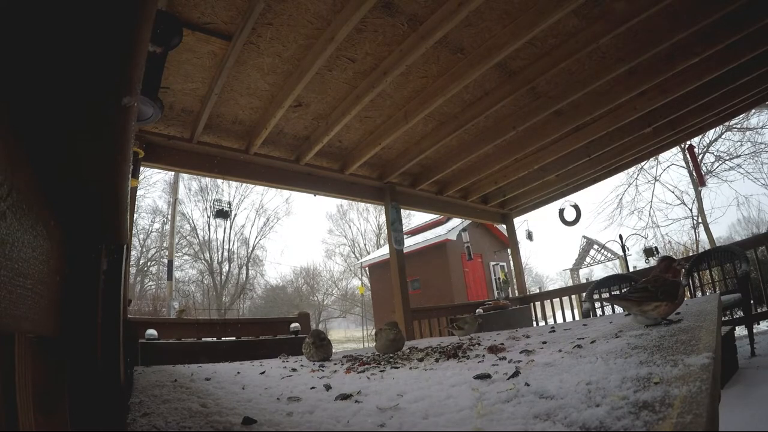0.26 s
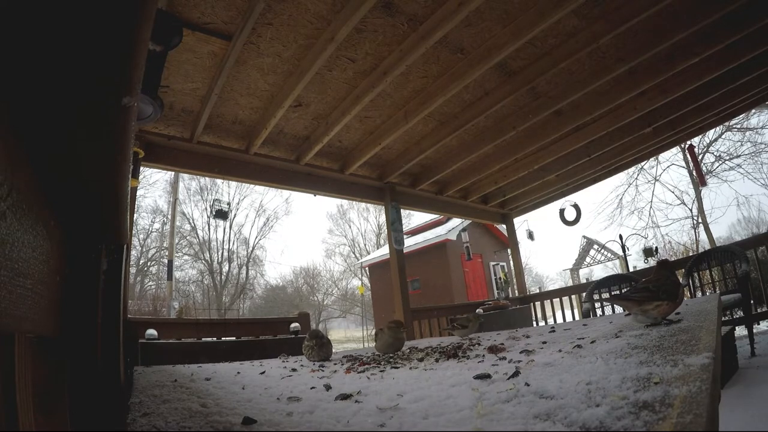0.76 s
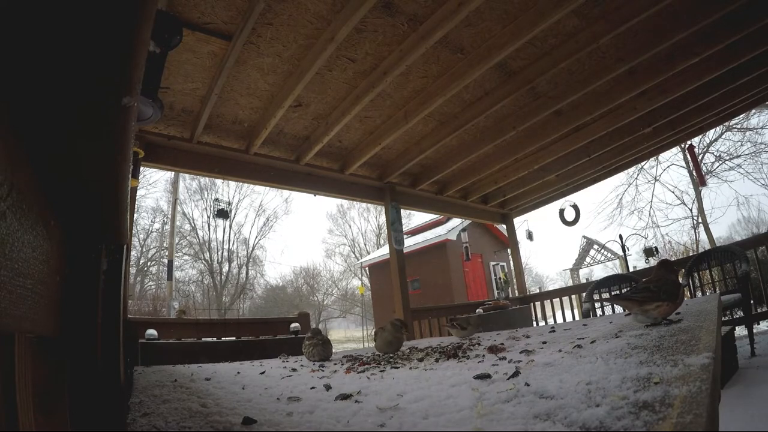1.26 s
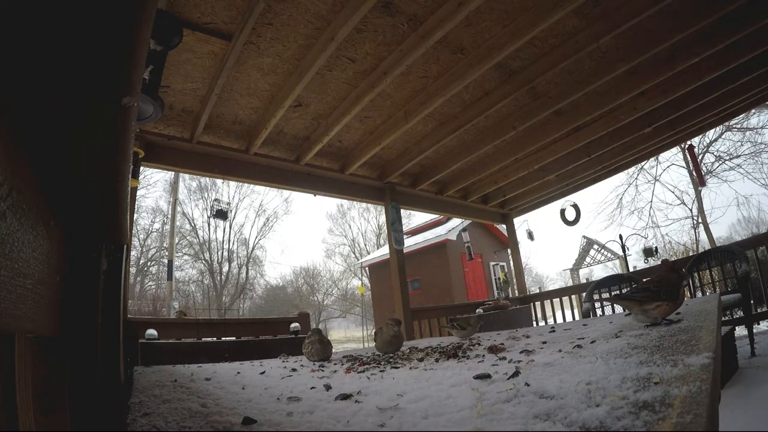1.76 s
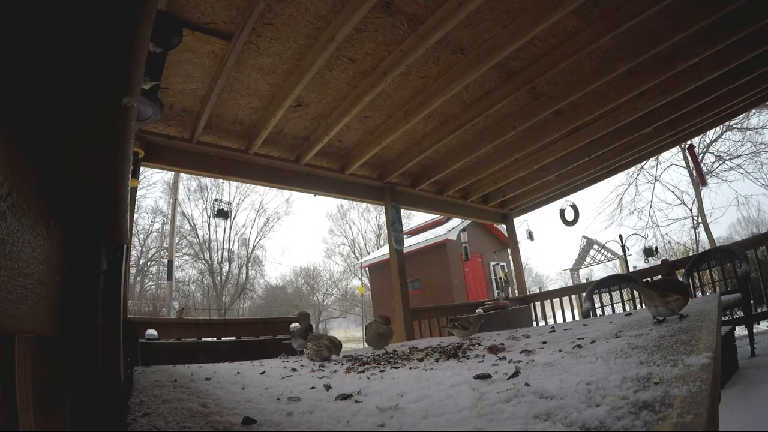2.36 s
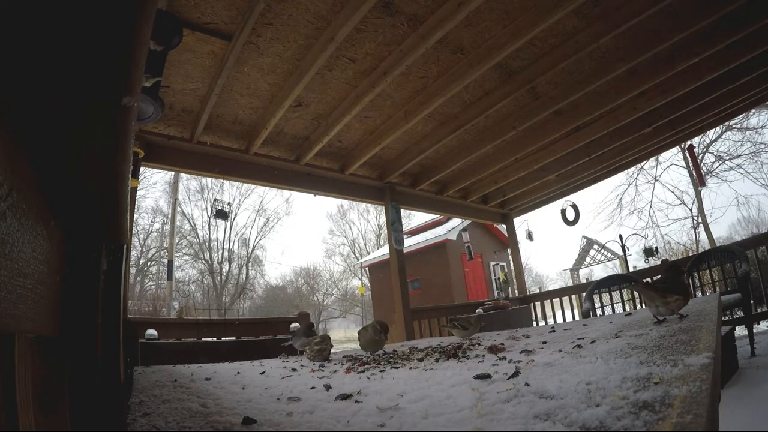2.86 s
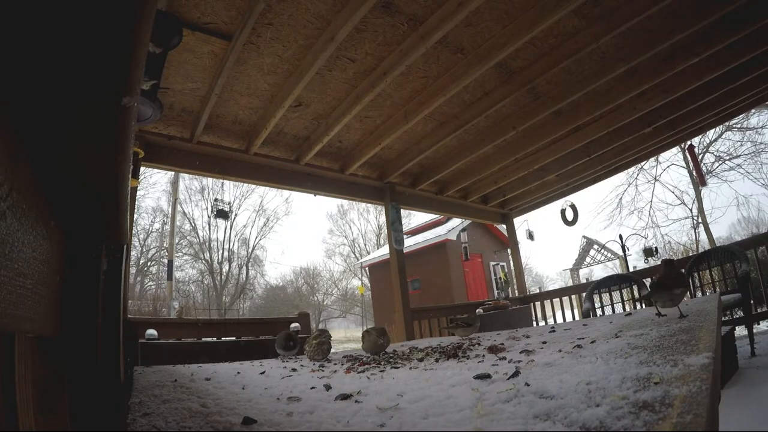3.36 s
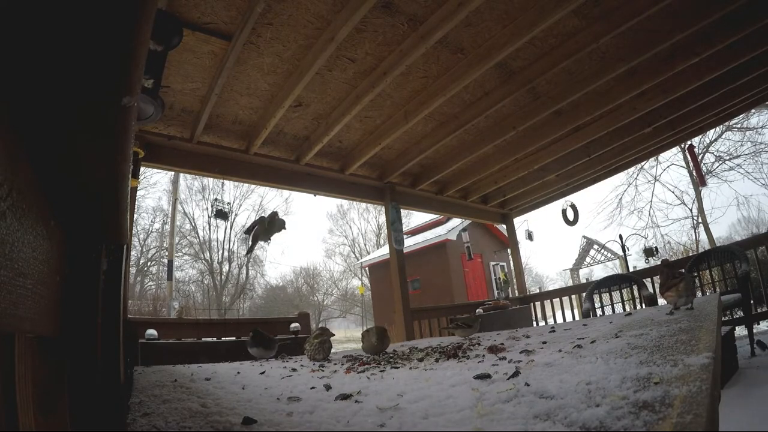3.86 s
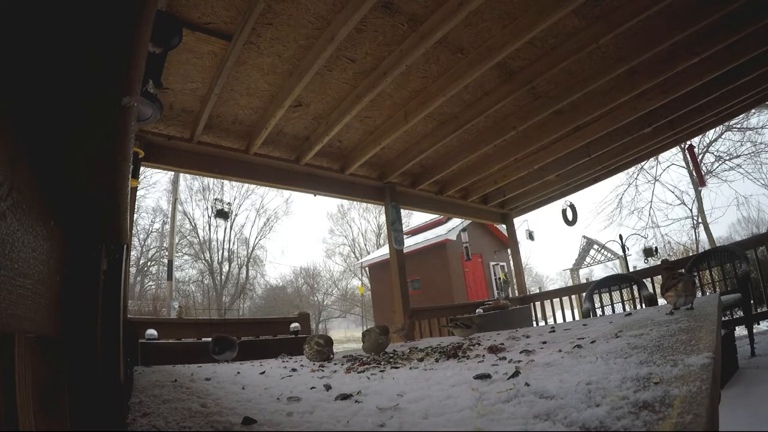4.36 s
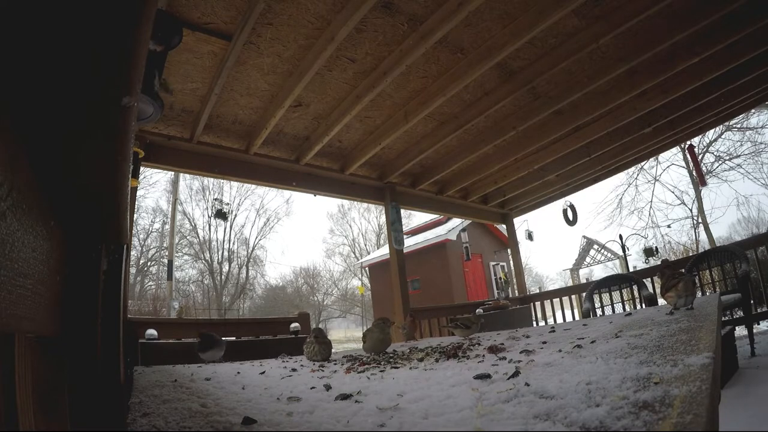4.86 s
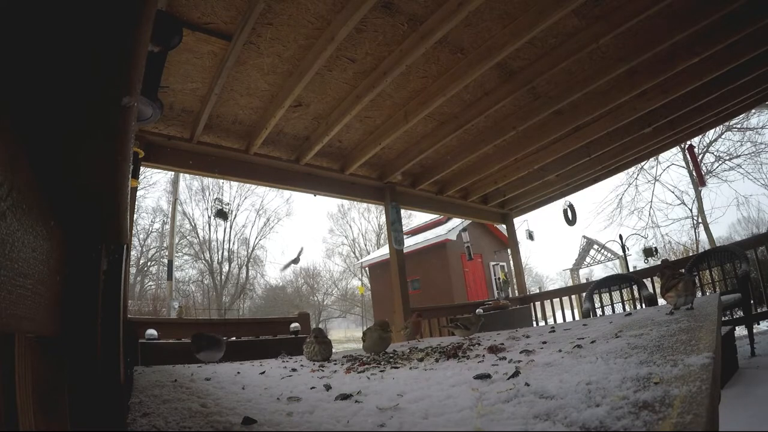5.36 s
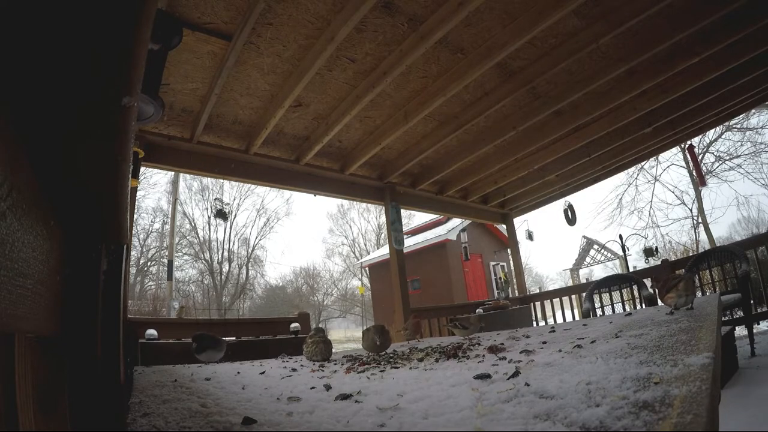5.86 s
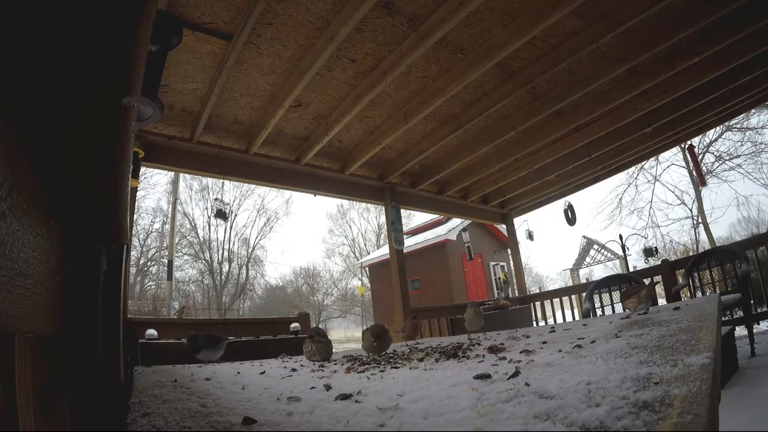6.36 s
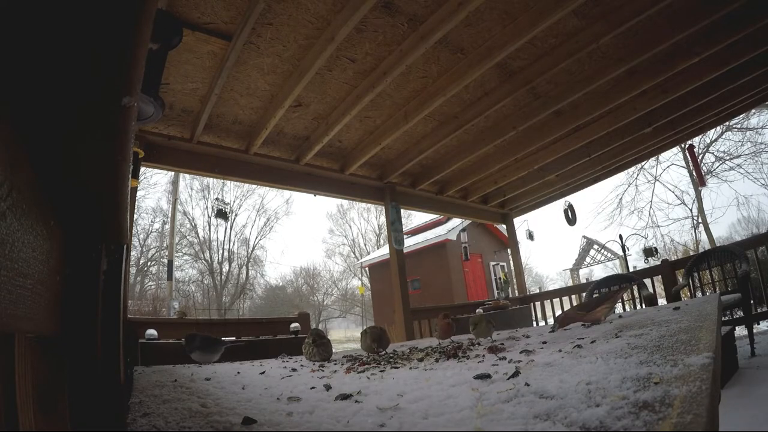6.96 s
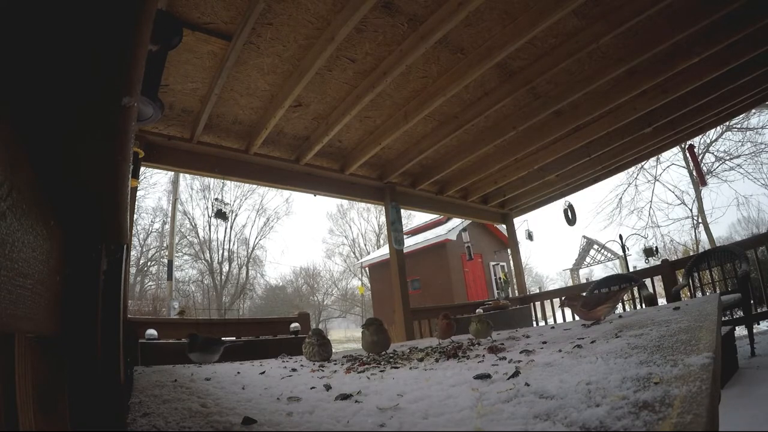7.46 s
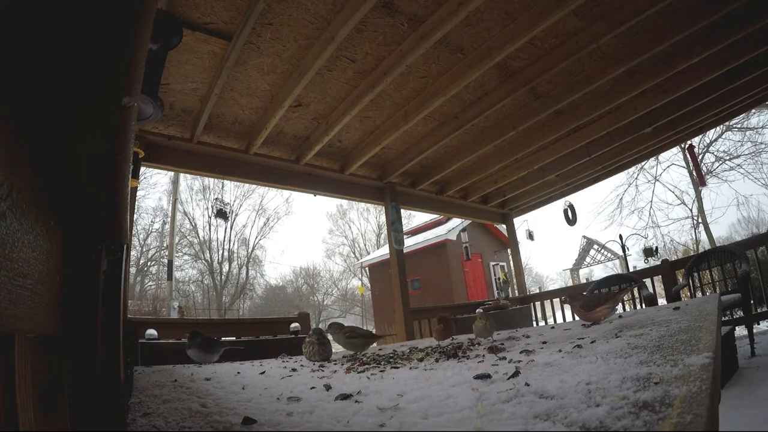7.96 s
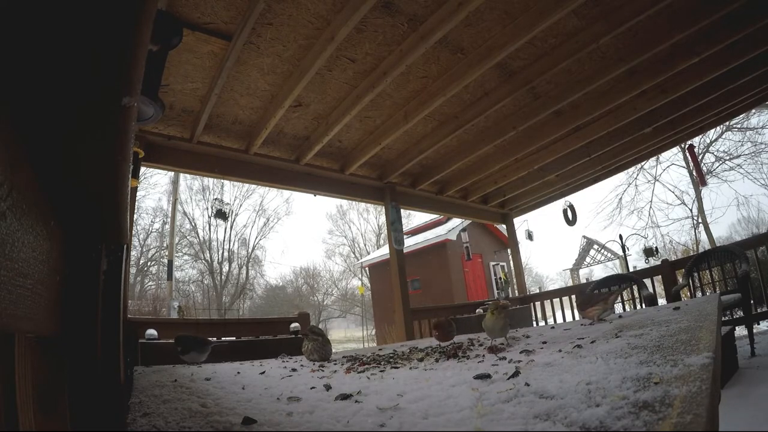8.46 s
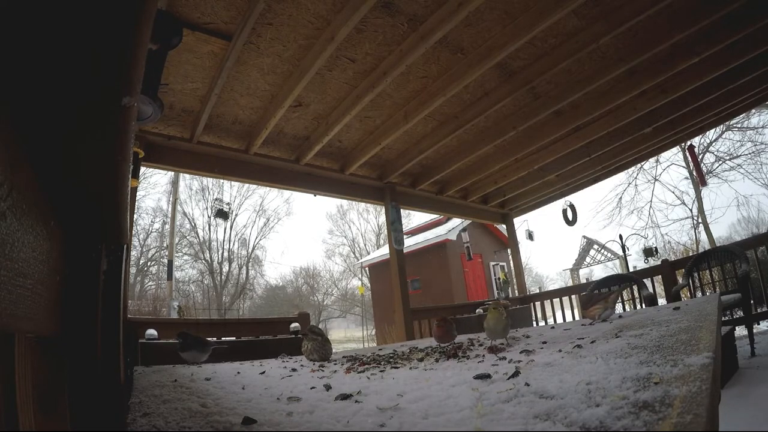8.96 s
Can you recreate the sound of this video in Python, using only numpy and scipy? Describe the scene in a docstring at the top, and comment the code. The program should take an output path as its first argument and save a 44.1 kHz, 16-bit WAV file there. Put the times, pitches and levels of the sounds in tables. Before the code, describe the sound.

Dry irregular ticks and small rustles start at once, close to the microphone, beneath a sheltering wooden roof with short echoes. A bird chirps thinly, then scolds nearby: a bright whistle falling into hoarseness, then three buzzing two-toned notes. A distant vehicle passes faintly. Quiet chirps dot the middle, and pecking grows busy and crisp later, over rumbling far traffic, soft hiss and low wind bumps.

```python
"""Small birds feed on a snowy porch table: bills tick on seed, feet and husks rustle from start to end.
Far traffic rumbles, a faint hiss stays on and light wind thuds on the microphone throughout.
After a thin chirp, one bird scolds close by with both sides of its syrinx: a falling note, then three raspy ones.
As the last raspy note ends, a far vehicle swells out of the traffic; more chirps follow among the pecks.
Noise is filtered into wind, traffic and hiss; clicks ring as husks and seed; wavering sines make the voices."""
import sys
import numpy as np
from scipy import signal
from scipy.fft import rfft, irfft, next_fast_len
from scipy.io import wavfile
from scipy.ndimage import uniform_filter1d

SR = 44100
rng = np.random.default_rng(int(sys.argv[2]) if len(sys.argv) > 2 else 0)


def output_pcm(signal):
    """Save a mono or channel-first signal as 16-bit PCM at the path in sys.argv[1].

    Samples are clipped to [-1, 1] before scaling.
    """
    pcm = np.clip(np.atleast_2d(signal).T, -1, 1) * 32767
    wavfile.write(sys.argv[1], SR, np.round(pcm).astype(np.int16))


N = 405719   # length in samples


def amp(db):
    """Turn a level in dB into a gain."""
    return 10 ** (np.asarray(db) / 20)


def rms_one(x):
    """Scale a sound to an average strength (rms) of 1."""
    return x / np.sqrt(np.mean(np.abs(x) ** 2) + 1e-20)


def evened(x, size=600):
    """Hold the strength, averaged over size samples, near 1."""
    return x / np.sqrt(uniform_filter1d(x ** 2, size=size).clip(0) + 1e-12)


def stretch(rows):
    """Give the samples a table covers, and each of its columns drawn as straight lines between the rows."""
    s, *columns = np.transpose(rows)
    at = np.arange(max(round(s[0] * SR), 0), min(round(s[-1] * SR), N))
    return at, [np.interp(at / SR, s, column) for column in columns]


def level(tables):
    """Make a gain over time from tables of seconds and dB: silent outside them, with soft ends."""
    gain = np.zeros(N)
    for rows in tables:
        at, (db,) = stretch(rows)
        gain[at] = amp(db)
    return uniform_filter1d(gain, size=300)


def coloured(x, spectrum):
    """Filter a sound by a table of Hz and dB, then scale it to rms 1."""
    size = next_fast_len(N)
    hz, db = np.transpose(spectrum)
    bin_hz = np.arange(size // 2 + 1) * SR / size
    gain = amp(np.interp(np.log(bin_hz + 1), np.log(hz), db))   # straight lines over log pitch
    return rms_one(irfft(rfft(x, size) * gain, size)[:N])


def band(x, hz, ratio):
    """Ring like a broad resonance, from hz / ratio to hz * ratio."""
    return signal.sosfilt(signal.butter(1, [hz / ratio, hz * ratio], "band", fs=SR, output="sos"), x)


def drift(hz, size=N):
    """Wander slowly by chance: noise sent twice through a one-pole low-pass, rms 1."""
    r = np.exp(-2 * np.pi * hz / SR)
    settle = 8000   # samples thrown away while the filter starts up
    noise = rng.standard_normal(size + settle)
    return rms_one(signal.lfilter([1], [1, -2 * r, r * r], noise)[settle:])


def crackle(per_s, spread_db, shape):
    """Scatter random clicks of uneven size and either sign, rms 1."""
    sizes = amp(spread_db * np.minimum(rng.exponential(1, shape), 5))
    signs = rng.choice([-1, 1], shape)
    return rms_one(sizes * signs * (rng.random(shape) < per_s / SR))


# Sound colours of wind, traffic and hiss. Each row: pitch in Hz, relative strength in dB per Hz.
WIND_COLOUR = [(12, 8), (30, 15), (45, 13), (70, -1.5), (120, -51)]
TRAFFIC_COLOUR = [(18, -1.5), (30, -6), (76, -0.5), (279, -13.5), (491, -13.5), (561, -15), (850, -29),
                  (1600, -38), (2080, -42), (3520, -120)]
HISS_COLOUR = [(530, -28), (900, 4.5), (1550, -3.5), (2710, 3), (4150, -1.5), (8760, -10), (13100, -12),
               (15300, -11)]
# Strength of the wind, then of the traffic. Each row: time in seconds, level in dB.
WIND_GUSTS = [(0.0, -56), (0.28, -30.5), (0.56, -47.5), (1.28, -37), (1.87, -48), (2.02, -42.5),
              (3.12, -50), (3.48, -39.5), (4.02, -44.5), (4.15, -35), (4.61, -45), (4.92, -35.5),
              (5.3, -39.5), (5.81, -46.5), (6.0, -43.5), (7.97, -49), (8.81, -37.5), (9.2, -34.5)]
TRAFFIC_LEVEL = [(0.0, -41), (2.2, -42), (4.7, -43.5), (6.4, -44), (9.2, -43)]
HISS_DB = -64
# One far vehicle: when it is loudest, how widely it spreads in time, its level and its pitch.
PASS_S, PASS_SPREAD_S, PASS_DB, PASS_HZ = 3.38, 0.47, -62, 780


def background():
    """Lumpy wind, traffic rumble, one passing vehicle and a steady hiss, each from filtered noise."""
    t = np.arange(N) / SR
    steady_wind = evened(coloured(rng.standard_normal(N), WIND_COLOUR), size=9000)
    wind = level([WIND_GUSTS]) * steady_wind
    traffic = level([TRAFFIC_LEVEL]) * coloured(rng.standard_normal(N), TRAFFIC_COLOUR)
    tyres = band(band(rng.standard_normal(N), PASS_HZ, 1.17), PASS_HZ, 1.17)
    swell = np.exp(-.5 * ((t - PASS_S) / PASS_SPREAD_S) ** 2)
    passing = amp(PASS_DB) * swell * rms_one(tyres)
    hiss = amp(HISS_DB) * coloured(rng.standard_normal(N), HISS_COLOUR)
    return wind + traffic + passing + hiss


# Busy feet among husks. Each row: time in seconds, level in dB.
PATTER_LEVEL = [(0.0, -48.5), (0.26, -64), (0.73, -67), (1.65, -66.5), (3.95, -72), (4.61, -65),
                (5.01, -68.5), (5.22, -66.5), (5.43, -69.5), (6.94, -67.5), (7.23, -67), (7.44, -54),
                (7.71, -63.5), (7.86, -77), (8.31, -64.5), (8.7, -62.5), (9.2, -69.5)]
# Sound colour of the husks. Each row: pitch in Hz, relative strength in dB per Hz.
HUSK_COLOUR = [(760, -12), (1300, -8.5), (2570, -3.5), (3570, -9.5), (4720, -5.5), (5620, -17), (6240, -10),
               (7510, -19.5), (15300, -22)]


def patter():
    """Many faint contacts in clumps; each click rings one of ten husk sizes."""
    grains = crackle(2500, 3.0, N) * amp(4 * drift(25))
    pitches_hz = np.geomspace(1500, 13000, 10)
    dealt = rng.integers(0, 10, N)   # which husk each click lands on
    rings = np.zeros(N)
    for k, hz in enumerate(pitches_hz):
        hits = grains * (dealt == k) * amp(3.4 * drift(27))
        rings += rms_one(band(hits, hz, 1.08)) * np.sqrt(hz)
    return level([PATTER_LEVEL]) * coloured(rings, HUSK_COLOUR)


# Pecks and hops. Each row: start in seconds, peak of the crack in dB, pitch of the ring in Hz,
# treble in dB over the ring, rustle in dB over the crack, length of the rustle in milliseconds.
CONTACTS = [(0.047, -33, 2920, -15, -5, 8.1), (0.08, -48, 4500, -20, -3, 14),
            (0.1246, -41, 4230, -7, -2, 19), (0.164, -45, 2390, -20, -8, 12),
            (0.2127, -45, 4630, -11, -0.5, 12.4), (0.2833, -36.5, 3580, -18, -9, 12),
            (0.301, -44.5, 3080, -17, 0, 20.4), (0.455, -48, 3480, -16, -5, 18),
            (0.505, -43, 2670, -15, -11, 70), (0.732, -43, 3060, -29, -12.5, 27),
            (1.0522, -48, 4500, -20, -5, 10), (1.061, -37.5, 2370, -19, -16, 20),
            (1.153, -47, 2360, -11, -5, 23), (1.285, -45, 2000, -32, -6, 18),
            (1.633, -39, 2670, -14, -13, 25), (2.0505, -31.5, 3300, -14, -13, 21.5),
            (2.122, -39.5, 3400, -14, -7, 24), (2.604, -39.5, 2200, -14, -7, 16),
            (2.63, -35, 2430, -18, -15, 12), (3.1283, -41, 3000, -13, -11.5, 60),
            (3.1806, -39.5, 2880, -11, -12, 96), (3.2273, -41, 3880, -16, -8, 30),
            (3.462, -53, 3000, -15, -15, 15), (3.568, -43, 2480, -16, -10, 14),
            (3.694, -41, 3870, -2, -9.5, 25), (3.878, -48, 4200, -7, -13, 25),
            (4.03, -53, 2600, -14, -2.5, 31), (4.139, -35, 3880, -17, -5.5, 14.5),
            (4.16, -46, 2980, -15, -3, 25), (4.33, -56, 4200, -6, -4, 23), (4.443, -47, 7540, -8, -12, 11),
            (4.487, -52, 2400, -20, -7, 13), (4.553, -51, 4000, -3, 0, 22), (4.585, -47, 2800, -14, -4, 25),
            (4.619, -46, 2030, -7, -1, 16), (4.674, -48, 3800, -18, -5, 12),
            (4.726, -43, 3500, -16, -11, 10), (4.765, -48, 3000, -12, -4, 14),
            (4.788, -37.5, 3080, -8, -7, 17), (5.034, -51, 3000, -17, -12, 12),
            (5.078, -43.5, 2640, -10, -6, 14), (5.6334, -50, 3990, -11, -1, 18),
            (5.8426, -48, 5000, -15, -11, 14), (5.86, -40, 2900, -18, -13, 19),
            (5.963, -51, 7000, -5, -10, 12), (6.4677, -40, 3000, -16, -2.5, 22),
            (6.583, -43.5, 4050, -8, -12, 22), (6.7068, -39, 3080, -17, -8.5, 22),
            (6.7648, -46.5, 3220, -22, -8.5, 45), (6.8576, -48, 4100, -11, -4, 35),
            (6.951, -37.5, 3100, -14.5, -20, 20), (7.0227, -42, 2940, -25, -24, 17),
            (7.0808, -46, 2750, -23, -10, 16), (7.2377, -47, 2960, -19, -7, 35),
            (7.2755, -35.5, 4730, -13, -8, 14), (7.2945, -44, 4300, -13, -2.5, 39),
            (7.354, -41.5, 4700, -14, -6.5, 18), (7.429, -51, 2920, -12, -10, 23),
            (7.4904, -40, 2110, -16.5, -5.5, 39), (7.5403, -40.5, 2900, -16, -12, 44),
            (7.6216, -48, 4230, -14, -3.5, 35), (7.642, -38.5, 3140, -22, -11, 23),
            (7.7029, -42, 6270, -14, 0, 9.5), (7.76, -35, 4330, -14, -8.5, 31),
            (7.8126, -40.5, 2780, -27, -9.5, 30), (7.882, -28, 4430, -7, -20.5, 26),
            (8.077, -47, 3000, -10, -5.5, 55), (8.1142, -41, 3140, -14, -5, 30),
            (8.203, -49, 6300, -25, -17, 12), (8.26, -54, 2680, -18, -6.5, 58),
            (8.3913, -55, 3050, -13, -2, 40), (8.4535, -37.5, 4770, -18, -24, 40),
            (8.4964, -43, 2450, -25, -7, 29), (8.5583, -48.5, 3210, -19, -6.5, 20),
            (8.853, -52, 3500, -18, -14, 12), (8.8727, -42.5, 3800, -12, -6, 26),
            (8.8992, -37.5, 4120, -15, -4, 9.6), (9.0844, -45, 2680, -10, -7, 14)]
CRACK_S, RUSTLE_RISE_S = 0.00098, 0.009   # time scales of the crack and of the swelling rustle


def pecks():
    """Each contact is a short crack, then a swelling and dying rustle; both ring husk and seed, with a treble edge."""
    t = np.arange(round(.18 * SR)) / SR
    cracks = rng.standard_normal((len(CONTACTS), len(t))) * t * np.exp(-t / CRACK_S)
    rustles = crackle(1500, 3.2, cracks.shape)
    seed_ratios = rng.uniform(1.19, 2.13, len(CONTACTS))   # pitch of the seed over that of the husk
    edge = signal.butter(2, 8600, "high", fs=SR, output="sos")
    out = np.zeros(N + len(t))
    for row, crack, rustle, seed_ratio in zip(CONTACTS, cracks, rustles, seed_ratios):
        s, db, hz, treble_db, rustle_db, length_ms = row
        force = np.array([crack, rustle])
        husk = band(force, hz, 1.148)
        seed = amp(-8.5) * band(force, seed_ratio * hz, 1.195)
        treble = amp(treble_db) * signal.sosfilt(edge, force)
        crack_sound, rustle_sound = husk + seed + treble
        swell = (1 - np.exp(-t / RUSTLE_RISE_S)) * np.exp(-(1000 * t / length_ms) ** 2)
        contact = crack_sound / np.abs(crack_sound).max()
        contact += amp(rustle_db) * swell * rms_one(rustle_sound)
        out[round(s * SR):][:len(t)] += amp(db) * contact
    return out[:N]


def voice(tables, rough, waver_hz, flutter, flutter_hz):
    """A membrane swings near a sine with its octave; pitch, phase and swing waver, a fast flutter splits each line."""
    out = np.zeros(N)
    for rows in tables:
        at, (hz, *partials_db) = stretch(rows)
        size = len(at)
        jumps = np.round(drift(14, size))   # the membrane hops between nearby pitches
        wobble = 1 + rough * (.01 * drift(40, size) + .025 * jumps)
        phase = 2 * np.pi * np.cumsum(hz * wobble) / SR + rng.uniform(0, 2 * np.pi)
        beat_hz = flutter_hz * (1 + .15 * drift(25, size))
        beat = np.cos(2 * np.pi * np.cumsum(beat_hz) / SR)
        ends = signal.windows.tukey(size, 200 / size)   # 100 samples of fade at each end
        for k, db in enumerate(partials_db, 1):
            swing = rms_one((1 + .6 * rough * drift(waver_hz, size)) * (1 + flutter * beat))
            sine = np.sin(k * phase + rough * drift(waver_hz, size))
            out[at] += np.sqrt(2) * ends * amp(db) * swing * sine
    return out


def yard(x, tail_db, t60):
    """Snow, rails and shed return a short diffuse tail: noise that drops 60 dB in t60 seconds."""
    t = np.arange(round(.15 * SR)) / SR
    tail = rms_one(rng.standard_normal(len(t))) * amp(tail_db - 60 * t / t60)
    return x + signal.fftconvolve(x, tail)[:N]


# Whistled notes. Each row: start in seconds, length in seconds, first, middle and last pitch in Hz,
# peak level in dB, and the share of the length (0 to 1) at which it peaks.
CHIRP_NOTES = [(1.352, .168, 7900, 7460, 8300, -55.5, .15), (3.795, 0.061, 2950, 3130, 3280, -52.5, 0.38),
               (3.805, 0.039, 3560, 3670, 3500, -64, .35), (4.174, 0.093, 2730, 2960, 2810, -57, 0.3),
               (4.2, .04, 3600, 3650, 3600, -66, .4), (5.04, .06, 2670, 3010, 3300, -59.5, 0.5),
               (5.13, 0.18, 3270, 3220, 3020, -68, .3), (5.26, .14, 8130, 7600, 8400, -53, 0.14),
               (5.647, .085, 7200, 5960, 5480, -59, 0.4), (5.775, .14, 8150, 7250, 7600, -72, 0.36),
               (5.792, 0.053, 2530, 4450, 2800, -57, 0.93), (5.918, 0.041, 2480, 4380, 2800, -60, 0.74),
               (8.8, 0.036, 2790, 3190, 3140, -57.5, .3)]
CHIRP_RISE_DB, CHIRP_FADE_DB = 18, 13   # from the start up to the peak, from the peak down to the end


def chirps():
    """Birds farther off: thin notes with a tail; the pitch bends smoothly, the level rounds over its peak."""
    u = np.linspace(0, 1, 21)   # share of the note gone by
    tables = []
    for s, length, *hz, db, peak in CHIRP_NOTES:
        rise_db = CHIRP_RISE_DB * (1 - u / peak) ** 2
        fade_db = CHIRP_FADE_DB * ((u - peak) / (1 - peak)) ** 2
        bend_hz = np.polyval(np.polyfit([0, .5, 1], hz, 2), u)   # a parabola through the three pitches
        tables.append(np.c_[s + length * u, bend_hz, db - np.where(u < peak, rise_db, fade_db)])
    return yard(voice(tables, .48, 300, .5, 280), -34, 0.15)


def line(rows, *partials_db, above_hz=0):
    """One voice of a note: its pitch, and each partial so many dB over the level in the table."""
    rows = np.array(rows)
    return np.c_[rows[:, 0], rows[:, 1] + above_hz, rows[:, 2:] + partials_db]


# What the throat lets out of each pitch. Each row: pitch in Hz, level in dB over the effort.
THROAT_GAIN = [(1550, -26), (1900, -12), (2150, -5.5), (2400, -10.5), (2700, 2), (3300, -0.5), (3700, -2.5),
               (4200, 1), (4800, -5.5), (5300, -7.5)]
FULL_EFFORT_DB, OCTAVE_STEEPER = -48, 0.27   # the octave loses this much more per dB below full effort


def rasp(note):
    """Both voices of a raspy note: base pitch and octave follow effort and throat; soft singing is duller."""
    s, low_hz, high_hz, effort_db = np.transpose(note)
    pitch_hz, gain_db = np.transpose(THROAT_GAIN)
    octave_db = effort_db + OCTAVE_STEEPER * (effort_db - FULL_EFFORT_DB)
    lines = []
    for hz in (low_hz, high_hz):
        base = effort_db + np.interp(hz, pitch_hz, gain_db)
        octave = octave_db + np.interp(2 * hz, pitch_hz, gain_db)
        lines.append(np.c_[s, hz, base, octave])
    return lines


# Clear whistle of the opening note. Each row: time in seconds, pitch in Hz, level in dB.
CLEAR_WHISTLE = [(1.707, 7270, -75), (1.721, 9400, -44.5), (1.735, 8000, -48), (1.75, 7580, -43.5),
                 (1.775, 7260, -43), (1.786, 7550, -44), (1.8, 7000, -43), (1.815, 8000, -45),
                 (1.83, 6600, -54)]
WHISTLE_OCTAVE_DB, COMPANION_HZ, COMPANION_DB = -16, 970, -8   # a fainter line rides above the whistle
# Opening note: the hoarse fall, then the lower voice. Each row: time in seconds, pitch in Hz, level in dB.
HOARSE_VOICES = [
    [(1.81, 6800, -60), (1.83, 6400, -52), (1.885, 4530, -49.5), (1.92, 4265, -47), (1.95, 3430, -49),
     (2.01, 3260, -55)],
    [(1.73, 2790, -55), (1.755, 2900, -52.5), (1.775, 3374, -40.5), (1.845, 3320, -43.5),
     (1.865, 2820, -53), (1.93, 2656, -48), (1.95, 2410, -65), (1.99, 2200, -60)],
]
# Buzz of the opening note. Each row: time in seconds, level in dB.
OPENING_BUZZ = [(1.72, -65), (1.774, -56), (1.86, -50), (1.982, -56), (2.01, -70)]
# Three raspy notes. Each row: time in seconds, low voice in Hz, high voice in Hz, effort in dB.
RASPY_NOTES = [
    [(2.135, 1870, 2396, -56), (2.195, 1960, 2460, -47), (2.25, 2042, 2520, -46), (2.32, 2140, 2660, -48),
     (2.345, 1917, 2616, -48), (2.41, 1980, 2440, -48), (2.43, 1767, 2364, -44), (2.51, 1846, 2503, -47.5),
     (2.545, 1880, 2440, -71)],
    [(2.68, 1600, 1890, -68), (2.71, 1575, 1943, -55.5), (2.76, 1568, 2020, -52.5),
     (2.82, 1693, 2204, -48.5), (2.87, 1782, 2360, -45), (2.94, 1880, 2454, -45), (2.99, 1726, 2120, -47.5),
     (3.04, 1622, 2097, -49), (3.08, 1546, 1900, -73)],
    [(3.14, 1536, 2070, -68), (3.23, 1636, 2060, -54), (3.26, 1666, 2200, -57), (3.29, 1660, 2090, -53.5),
     (3.32, 1660, 2164, -57), (3.335, 1970, 2223, -54.5), (3.365, 1980, 2174, -66),
     (3.385, 2020, 2200, -80)],
]
RASP_BUZZ_DB = -3   # buzz over the effort
# Sound colour of the buzz. Each row: pitch in Hz, relative strength in dB per Hz.
BUZZ_COLOUR = [(1200, -50), (1800, -6), (3000, 10), (4500, 6), (5500, 3), (7600, -3), (8700, -9.5),
               (10100, 1), (11200, -5), (12500, 3.5), (14000, -9), (15300, -6)]


def scold():
    """Two voices at once; the membranes slap, which mixes both pitches into a buzz of treble lines and hiss."""
    fall, lower = [[line(rows, 0, -10)] for rows in HOARSE_VOICES]   # octave 10 dB down
    hoarse = voice(fall, .88, 300, .8, 600) + voice(lower, .48, 350, .6, 700)
    first, second, third = [rasp(note) for note in RASPY_NOTES]
    rasps = voice(first, .57, 140, .55, 170) + voice(second + third, .66, 150, .9, 230)

    pressed = np.maximum(evened(hoarse + rasps) - .6, 0)   # only the part of each swing that hits
    slaps = np.diff(pressed, 2, append=[0, 0])
    buzz = evened(coloured(rms_one(slaps) + 1.6 * rng.standard_normal(N), BUZZ_COLOUR))
    efforts = [np.array(note)[:, [0, -1]] for note in RASPY_NOTES]
    buzz_level = level([OPENING_BUZZ]) + amp(RASP_BUZZ_DB) * level(efforts)

    clear = line(CLEAR_WHISTLE, 0, WHISTLE_OCTAVE_DB)
    companion = line(CLEAR_WHISTLE[2:-1], COMPANION_DB, above_hz=COMPANION_HZ)   # once settled
    whistle = voice([clear, companion], 0.19, 180, 0.22, 500)
    return whistle + hoarse + rasps + buzz_level * buzz


# Echoes from roof, wall and posts. Each row: delay in seconds, level in dB.
ECHOES = [(.007, -15), (0.018, -15), (.027, -51), (0.043, -16.5)]


def porch(x):
    """The woodwork returns a few echoes, dulled by a one-pole low-pass."""
    dull = signal.lfilter([.6], [1, -.4], x)
    out = x.copy()
    for s, db in ECHOES:
        lag = round(s * SR)
        out[lag:] += amp(db) * dull[:-lag]
    return out


def scene():
    """Birds under the roof, over the background."""
    birds = yard(scold(), -29, 0.14) + chirps() + pecks() + patter()
    return (porch(birds) + background())[None]


def record(dry):
    """A steep low-pass cuts the top."""
    return signal.sosfilt(signal.ellip(14, .5, 60, 15300, fs=SR, output="sos"), dry)   # cut at 15300 Hz


dry = scene()
out = record(dry)
output_pcm(out)
```